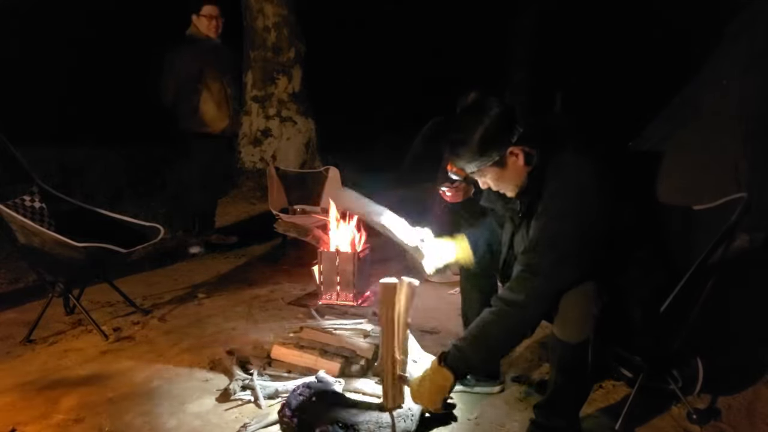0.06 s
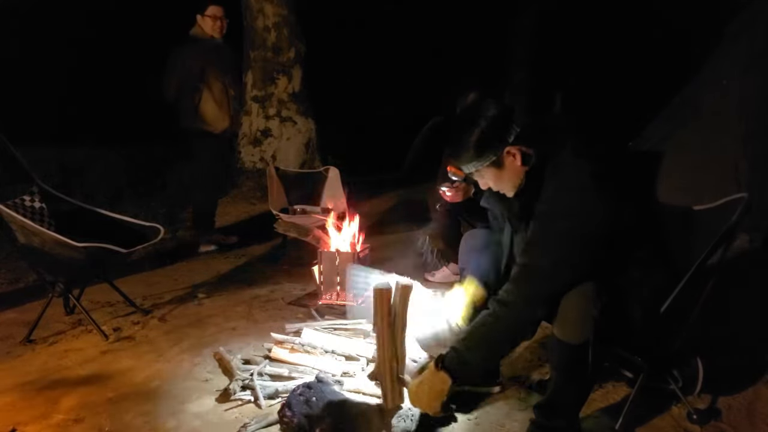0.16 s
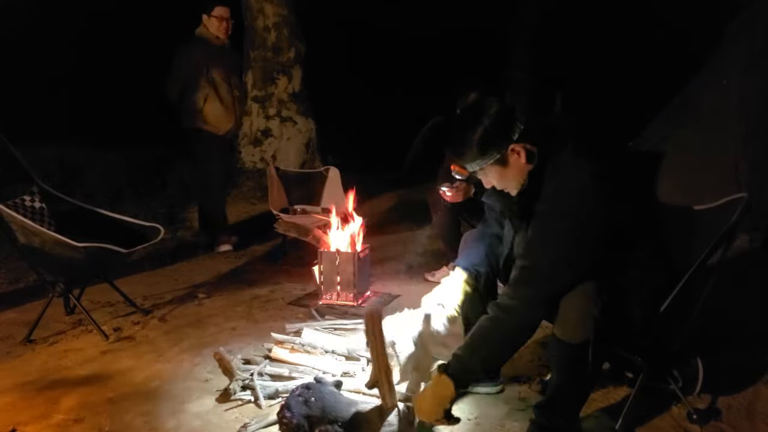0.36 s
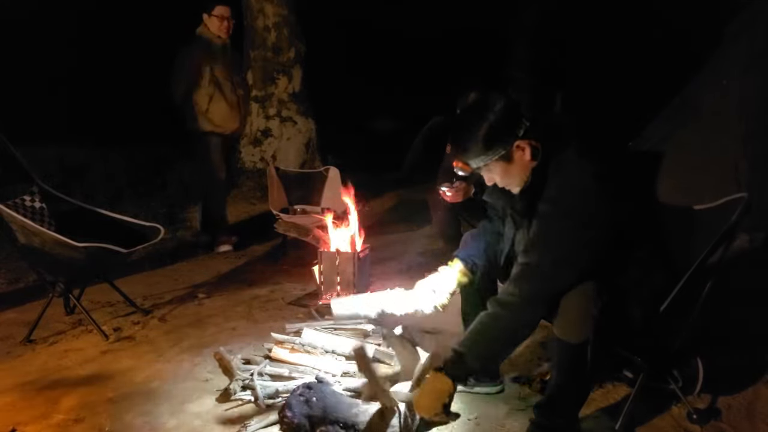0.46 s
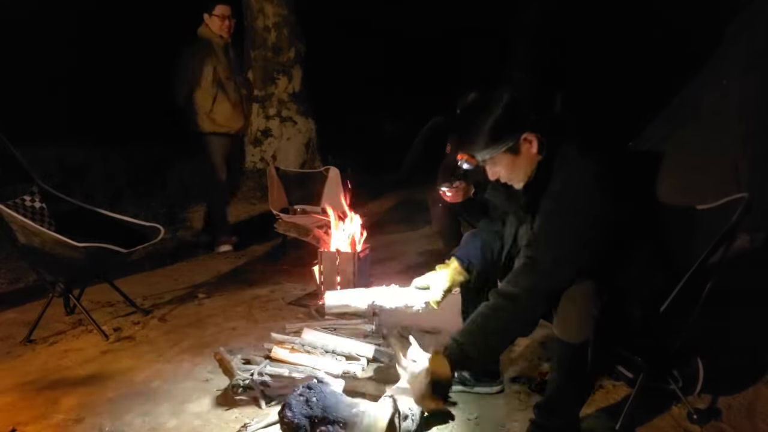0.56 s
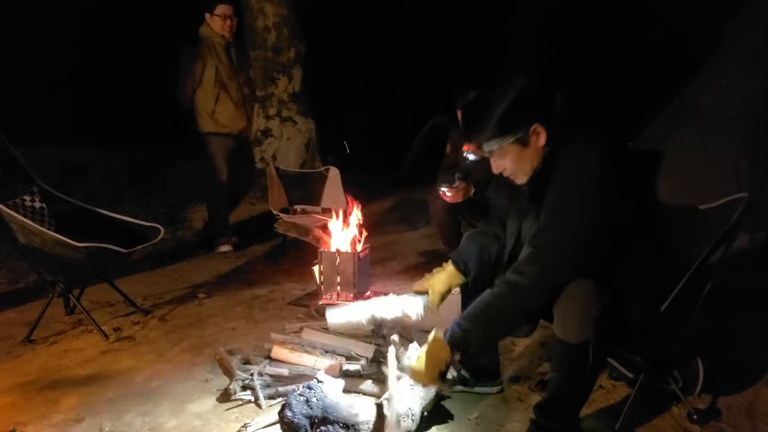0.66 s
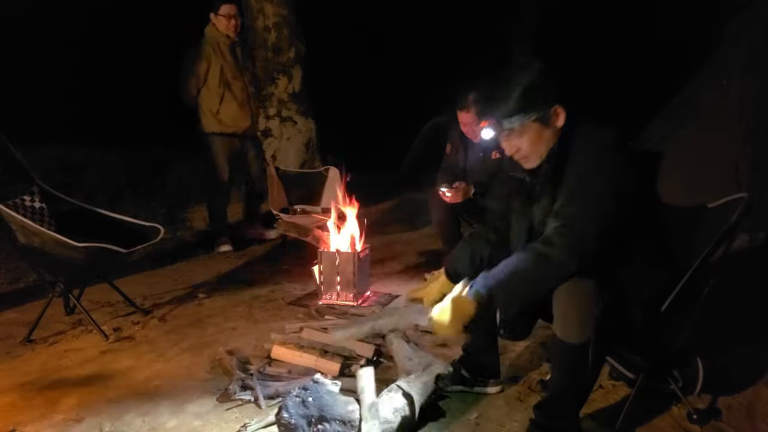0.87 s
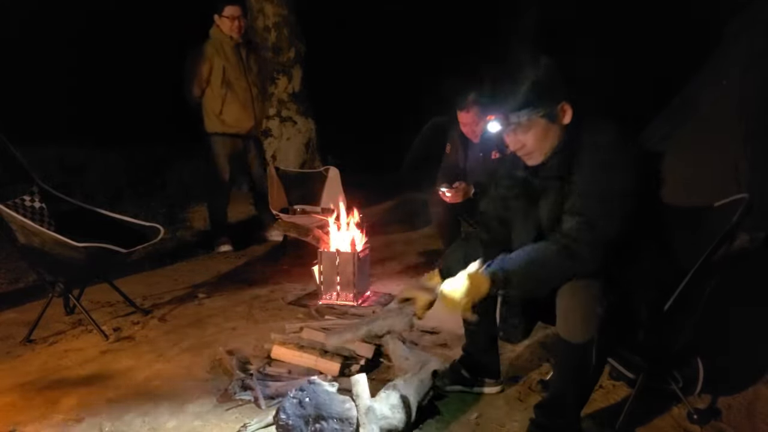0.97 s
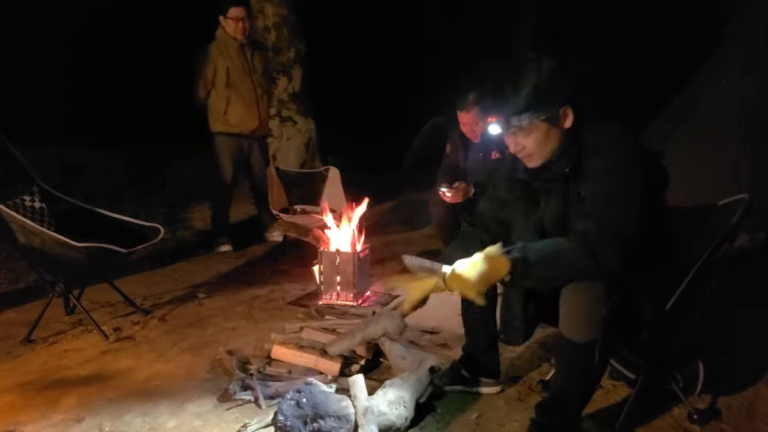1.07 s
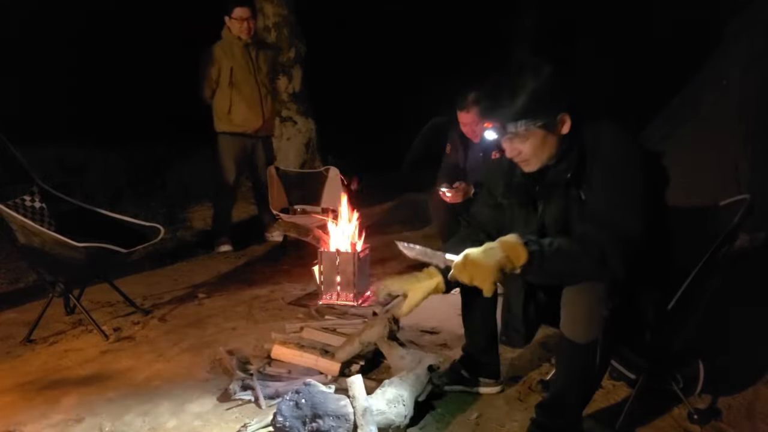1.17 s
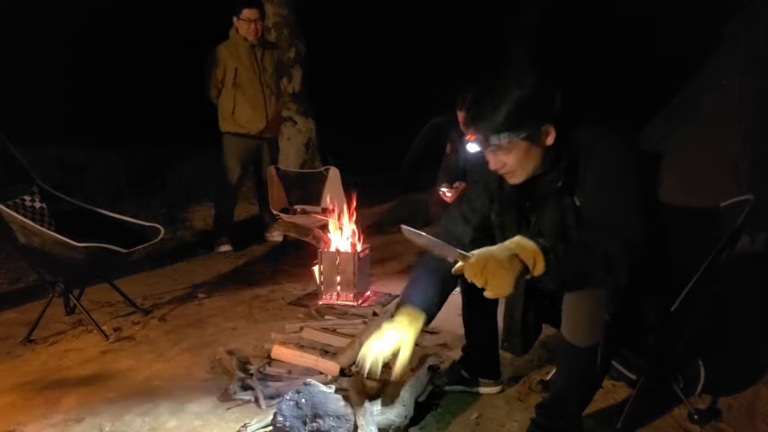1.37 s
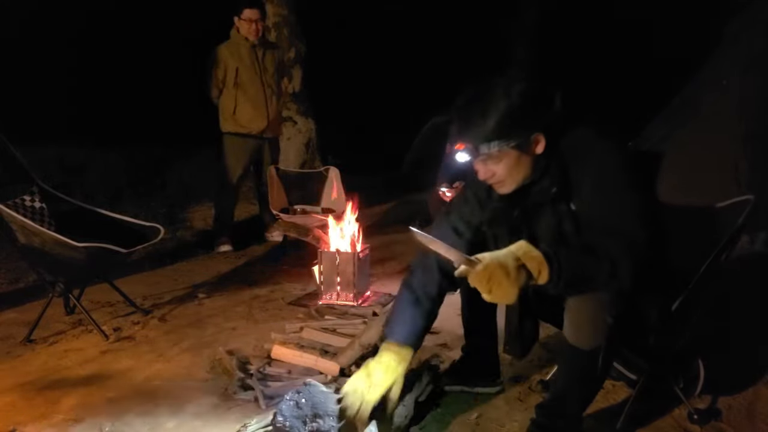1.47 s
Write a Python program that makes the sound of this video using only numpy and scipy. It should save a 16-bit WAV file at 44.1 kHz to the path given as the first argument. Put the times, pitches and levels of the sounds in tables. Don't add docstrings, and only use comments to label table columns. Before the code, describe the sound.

Firewood splitting: a hard crack of wood and steel, then lighter wooden knocks and dull thuds.

```python
import sys
import numpy as np
from scipy import signal
from scipy.fft import rfft, irfft
from scipy.io import wavfile
from scipy.ndimage import uniform_filter1d

SR = 44100
rng = np.random.default_rng(int(sys.argv[2]) if len(sys.argv) > 2 else 0)


def generate_wav(signal):
    frames = np.transpose(np.atleast_2d(signal))
    scaled = np.clip(frames, -1, 1) * 32767
    pcm = np.round(scaled).astype(np.int16)
    wavfile.write(sys.argv[1], SR, pcm)


def ratio_of_db(decibels):
    return 10 ** (np.asarray(decibels, float) / 20)


N = 66150

HARD_RISE_S, THUD_RISE_S, TAP_RISE_S = 0.00027, 0.001, 0.002
SPLIT_T60, POP_T60 = 0.012, 0.026
WIDTH_DB = -5.5

# frequency in Hz, density in dB per Hz.
SNAP_SPECTRUM = [(600, -3), (1000, -3.5), (2560, -4), (4500, -6), (6700, -5.5), (9000, -12), (14500, -8),
                 (16500, -18.5)]


def burst(db, hold_s, slope_db, t60):
    size, rise_s = 2048, 0.0004
    patch_db, patch_hz = 3.0, 600
    t = np.arange(size) / SR
    decay = ratio_of_db(-60 * np.maximum(t - hold_s, 0) / t60)
    shape = np.minimum(t / rise_s, 1) * decay
    patches = rng.standard_normal(size // 2 + 1)
    patches = evened(uniform_filter1d(patches, size=round(patch_hz * size / SR)))
    grit = irfft(rfft(pair(size, grit_db=3.5)) * ratio_of_db(patch_db * patches))
    return ratio_of_db(db) * shape * coloured(grit, SNAP_SPECTRUM, slope_db)


def ring(db, hz, t60, rise_s, sag=0.):
    sag_s = 0.006
    t = np.arange(round(.3 * SR)) / SR
    turns = np.cumsum(hz * (1 + sag * np.exp(-t / sag_s))) / SR
    return ratio_of_db(db - 60 * t / t60) * (1 - np.exp(-t / rise_s)) * np.sin(2 * np.pi * turns)


def knock(db, hz, t60, rise_s):
    blunt_push = ring(db - 9, 0.55 * hz, 0.019, rise_s)
    return ring(db, hz, t60, rise_s) + blunt_push


def strike(db, modes, slope_db=0.):
    out = 0
    for hz, own_db, t60 in modes:
        tilt_db = slope_db * np.log2(hz / 3000)
        out = out + ring(db + own_db + tilt_db, hz, t60, HARD_RISE_S)
    return out


SPLIT_TIMES = [
    .2125,
    .2177,
    .2271,
    .2312,
]
# level in dB, hold in seconds, brightness in dB per octave.
SPLIT_BURSTS = [(-13, 0.0048, -1.5), (-12, 0.0012, 3), (-26, 0.0034, 1), (-31.5, 0.0031, 1)]
# start in seconds, level in dB, hold in seconds,
# brightness in dB per octave.
CRACKS = [(0.4552, -55, 0.005, -7), (0.529, -50, 0.006, -4), (0.6612, -40, 0.004, -2),
          (0.675, -38, 0.0028, -4), (0.6861, -32.5, 0.0031, 2), (0.7034, -34, 0.002, -3),
          (.716, -41, 0.00099, 6), (0.721, -42, 0.0036, 13), (0.739, -40, 0.003, 6),
          (0.751, -41.5, 0.0023, 1), (0.78, -42, 0.016, -4), (.923, -46, 0.001, -8)]


def splitting():
    out = np.zeros((2, N))
    for s, (db, hold_s, slope_db) in zip(SPLIT_TIMES, SPLIT_BURSTS):
        add(out, s, burst(db, hold_s, slope_db, SPLIT_T60))
    for s, db, hold_s, slope_db in CRACKS:
        add(out, s, burst(db, hold_s, slope_db, SPLIT_T60))
    return out


# frequency in Hz, level in dB, t60 in seconds.
BLADE_MODES = [(3277, -15, 0.025), (3860, -13, 0.015), (4840, -16.5, .02), (2073, -16, 0.02),
               (11620, -17, 0.02), (9050, -19, 0.035)]
# start in seconds, level in dB, pitch in Hz, t60 in seconds.
SPRING = [(.2165, -12, 3290, .03), (.217, -14, 3870, .02), (.2175, -13, 7300, .016),
          (.2155, -11, 1346, .015), (.2155, -19, 2160, .016), (.2145, -19, 6315, .02),
          (.2275, -19, 1066, .04), (.2275, -27, 6200, .02), (.2275, -22, 1490, .04)]
# start in seconds, level in dB, pitch in Hz, t60 in seconds.
CHINKS = [(1.1708, -40.5, 3570, 0.032), (1.177, -42, 3300, 0.024), (1.174, -52, 1920, 0.05),
          (1.189, -56, 3800, 0.015), (1.293, -47.5, 3450, 0.029), (1.297, -52.5, 3840, 0.033)]


def blade():
    out = np.zeros((2, N))
    add(out, 0.2135, strike(0, BLADE_MODES))
    for s, db, hz, t60 in SPRING + CHINKS:
        add(out, s, ring(db, hz, t60, HARD_RISE_S))
    return out


# start in seconds, level in dB, pitch in Hz, t60 in seconds.
KNOCKS = [(0.2126, -10, 526, 0.038), (.2142, -8.5, 615, 0.019), (.2265, -5, 681, 0.053),
          (.2275, -9, 860, 0.051), (.228, -11.5, 614, 0.059), (.229, -9, 1333, 0.02),
          (.240, -19, 606, 0.023), (.6615, -26, 1010, 0.04), (.7045, -19, 500, 0.045),
          (.7105, -21, 620, 0.045), (.7215, -26.5, 553, 0.07), (.712, -27, 710, .04),
          (.7428, -24, 390, 0.025), (.794, -37, 1384, 0.06), (.787, -35.5, 1945, 0.053),
          (.706, -33, 2754, 0.033), (.677, -37, 1550, .04), (.678, -37, 3700, 0.015),
          (.686, -28.5, 1520, 0.014), (.686, -31.5, 2710, 0.027), (.709, -35, 1435, .04),
          (.722, -38, 3500, 0.012), (.662, -30, 571, .03), (.7525, -43, 2600, .02),
          (.9232, -35, 3200, .008), (.9232, -37, 4100, .006), (.7398, -37, 5600, .014),
          (.684, -38, 5240, .02), (.2135, -13, 370, .022), (.2285, -16, 540, .05),
          (0.2271, -10.5, 405, 0.021)]
# start in seconds, level in dB, pitch in Hz, t60 in seconds.
TAPS = [(.4738, -23, 640, .014), (.475, -29, 950, .014), (.5352, -24, 660, .018), (.5352, -25, 1200, .013),
        (.7808, -8.5, 545, .014), (.9232, -17, 580, .017), (.9298, -26, 450, .018), (.7945, -21, 486, .03),
        (.7905, -24, 750, .022), (.8215, -21, 440, .012), (.831, -29, 450, .015), (.799, -26, 700, .02),
        (.687, -23, 260, .03), (.811, -29, 350, .02), (.538, -33, 900, .03), (.2855, -27, 170, .04)]


def tumbling_pieces():
    out = np.zeros((2, N))
    for s, db, hz, t60 in KNOCKS:
        add(out, s, knock(db, hz, t60, HARD_RISE_S))
    for s, db, hz, t60 in TAPS:
        add(out, s, knock(db, hz, t60, TAP_RISE_S))
    return out


# start in seconds, level in dB, pitch in Hz, t60 in seconds.
THUDS = [(.232, -8.5, 82, 0.1), (.227, -13, 180, 0.056), (0.229, -21, 290, 0.05), (0.276, -30, 88.5, 0.098),
         (0.321, -29.5, 81, 0.09), (0.6614, -10, 187, 0.046), (0.667, -17.5, 98, 0.065),
         (0.703, -15.5, 114, 0.0674), (.706, -14.5, 335, 0.045), (.742, -11.5, 142, 0.02),
         (.738, -21, 100, 0.1), (0.797, -17.5, 170, 0.034), (0.801, -25, 300, 0.023),
         (0.9239, -33, 270, 0.035)]


def thuds():
    out = np.zeros((2, N))
    for s, db, hz, t60 in THUDS:
        add(out, s, ring(db, hz, t60, THUD_RISE_S, sag=0.25))
    return out


# start in seconds, level in dB, brightness in dB per octave.
TICKS = [(.6615, -36, -2), (.6685, -41, -1), (.6775, -44, -1), (.6858, -32, 1), (.6895, -35, 1),
         (.7036, -29, -2.5), (.7165, -44, 4), (.7215, -46, 0), (.7398, -39, 7), (.7445, -46, 3),
         (.7522, -44, 3), (.9232, -44, -2), (.5357, -47, -3), (.4565, -53, -4)]
# frequency in Hz, level in dB, t60 in seconds.
STICK_MODES = [(1430, 0, .02), (1850, -6, .012), (2420, -6, .015), (2700, -1, .025), (3700, -2, .014),
               (4850, -5, .012), (5500, -8, .012), (7200, -10, .01)]


def stick_ticks():
    out = np.zeros((2, N))
    for s, db, slope_db in TICKS:
        add(out, s, strike(db, STICK_MODES, slope_db))
    return out


# start in seconds, level in dB.
CHATTER = [(.7805, -40), (.7848, -36), (.7883, -32), (.7918, -35), (.7953, -38), (.799, -40), (.8025, -45)]
# frequency in Hz, level in dB, t60 in seconds.
EDGE_MODES = [(1400, -8, .014), (1930, -2, .016), (3400, 2, .011), (5400, -12, .01)]


def baton_chatter():
    out = np.zeros((2, N))
    for s, db in CHATTER:
        add(out, s, strike(db, EDGE_MODES))
    return out


def blow_tail():
    size, db, t60 = 20000, -35, 0.33
    out, t = np.zeros((2, N)), np.arange(size) / SR
    noise = coloured(pair(size, grit_db=2.5), HISS_SPECTRUM, -1.4)
    add(out, .222, ratio_of_db(db - 60 * t / t60) * noise)
    return out


# start in seconds, length in seconds, level in dB, top in Hz.
DRAGS = [(0.656, 0.056, -45, 4020), (0.5, 0.055, -52, 5000), (.645, 0.18, -49.5, 9000),
         (.765, 0.085, -46.5, 2930), (0.798, 0.25, -54.5, 3220), (0.967, 0.1, -47, 7050),
         (1.044, 0.15, -55.5, 9300), (1.16, 0.052, -50, 2000)]
# frequency in Hz, density in dB per Hz.
RUB_SPECTRUM = [(250, -10.5), (680, -8.5), (3200, -9.5), (6400, -16), (11200, -8.5), (14000, -10.5)]


def drags():
    size, out = 12000, np.zeros((2, N))
    for s, length_s, db, top_hz in DRAGS:
        u = np.clip(np.arange(size) / SR / length_s, 0, 1)
        swell = np.sin(np.pi * u) ** 2
        grit = coloured(pair(size, grit_db=1.2), RUB_SPECTRUM, 0., top_hz)
        add(out, s, ratio_of_db(db) * swell * grit)
    return out


# time in seconds, pitch in Hz, level in dB.
HOLLOW = [(.255, 760, -60), (.285, 930, -46), (.32, 1170, -50), (.37, 1260, -63), (.4, 1260, -110),
          (.79, 1377, -110), (0.801, 1377, -64), (.855, 1290, -53), (.93, 1081, -56.5), (.965, 856, -62),
          (1.013, 650, -44), (1.068, 580, -60.5)]


def hollow():
    width_hz, octave_db = 190, -17
    t = np.arange(N) / SR
    s, hz, db = np.transpose(HOLLOW)
    turn = np.exp(2j * np.pi * np.cumsum(np.interp(t, s, hz)) / SR)
    r = np.exp(-np.pi * width_hz / SR)
    slow = signal.lfilter([1], [1, -2 * r, r * r], rng.standard_normal((4, N)) / turn)
    hum = (turn * slow[:2] + ratio_of_db(octave_db) * turn ** 2 * slow[2:]).real
    hum = hum[0] + 0.48 * np.array([hum[1], -hum[1]])
    return evened(hum) * ratio_of_db(np.interp(t, s, db, -120, -120))


# start in seconds, level in dB, brightness in dB per octave, pan in dB.
POPS = [(0.0522, -43.5, 8.5, 4.5), (0.4242, -40.5, 8, 4), (1.123, -56, 8, 9), (1.2493, -41, 1, 6)]
# start in seconds, level in dB, pitch in Hz, t60 in seconds.
POP_RINGS = [(.0505, -45, 2750, .015), (.0505, -47, 1600, .015), (1.2495, -47, 2650, .02),
             (1.2495, -39, 600, .015), (1.2495, -40, 1300, .012), (.4245, -48, 3100, .012)]


def fire():
    rings = np.zeros((2, N))
    for s, db, hz, t60 in POP_RINGS:
        add(rings, s, ring(db, hz, t60, HARD_RISE_S))
    out = without_lows(rings, 77)
    for s, db, slope_db, pan_db in POPS:
        pan = ratio_of_db([[pan_db / 2], [-pan_db / 2]])
        add(out, s, burst(db, 0.00026, slope_db, POP_T60) * pan)
    return out


# frequency in Hz, t60 in seconds.
SCATTER_DECAY = [(100, 0.21), (600, 0.11), (1300, .18), (3500, 0.17), (9000, 0.1), (16000, 0.12)]


def scatter(x):
    size, likeness, wide_hz = SR // 2, 0.67, 300
    taps = np.zeros((2, size))
    at = np.arange(200, size - 20, 20)
    places = at + rng.integers(0, 20, (2, len(at)))
    np.put_along_axis(taps, places, rng.choice([-1., 1.], (2, len(at))), 1)
    apart = without_lows(taps[1], wide_hz)
    taps = taps[0] + likeness * np.array([apart, -apart])
    hz, t, z = signal.stft(taps, SR, nperseg=256)
    decay = ratio_of_db(-60 * t / read(SCATTER_DECAY, hz)[:, None])
    tail = signal.istft(z * decay, SR, nperseg=256)[1]
    return signal.fftconvolve(x, tail / np.linalg.norm(tail[0]), axes=1)[:, :N]


# time in seconds, level in dB.
WIND = [(0.0, -52), (0.472, -48), (1.5, -50)]
# frequency in Hz, density in dB per Hz.
RUMBLE_SPECTRUM = [(15, -14.5), (50, -0.5), (90, -10.5), (150, -10.5), (210, -22.5), (400, -32)]


def wind():
    low = rng.standard_normal(N) + 0.13 * rng.standard_normal((2, N))
    closed = list(RUMBLE_SPECTRUM) + [(700, -59)]
    return ratio_of_db(np.interp(np.arange(N) / SR, *np.transpose(WIND))) * coloured(low, closed)


# frequency in Hz, density in dB per Hz.
HISS_SPECTRUM = [(420, -10.5), (1050, -9.5), (2300, -18), (3300, -11.5), (6400, -24), (8500, -19),
                 (12500, -20), (15500, -21), (16000, -50.5)]
# frequency in Hz, left-right likeness from -1 to 1.
LIKENESS = [(60, 0.57), (180, 0.072), (550, 0.91), (1650, 0.054), (4970, -0.5), (15000, 0.01)]


def night_hiss():
    db, drift_db = -56.5, 1.7
    frames, hz = N // 256 + 5, np.fft.rfftfreq(1024, 1 / SR)
    a, b, c, d, patches = rng.standard_normal((frames, 513, 5)).T
    patches = uniform_filter1d(patches, size=14, axis=0)
    patches = evened(uniform_filter1d(patches, size=14, axis=1))
    same = np.clip(read(LIKENESS, hz), -1, 1)[:, None]
    left = a + 1j * b
    right = same * left + np.sqrt(1 - same ** 2) * (c + 1j * d)
    z = np.array([left, right]) * ratio_of_db(drift_db * patches)
    air = signal.istft(z, nperseg=1024, noverlap=768)[1][:, :N]
    return ratio_of_db(db) * coloured(air, HISS_SPECTRUM)


def evened(x):
    return x / np.sqrt(np.mean(x ** 2) + 1e-20)


def read(points, hz):
    f, value = np.transpose(points)
    return np.interp(np.log(hz + 1), np.log(f + 1), value)


def add(mix, s, sound):
    part = mix[..., round(s * SR):][..., :sound.shape[-1]]
    part += sound[..., :part.shape[-1]]


def without_lows(x, hz):
    return signal.sosfilt(signal.butter(2, hz, "high", fs=SR, output="sos"), x)


def coloured(x, points, slope_db=0., top_hz=20200.0):
    hz = np.fft.rfftfreq(x.shape[-1], 1 / SR)
    tilt_db = slope_db * np.log2(np.clip(hz, 500, None) / 4000)
    db = read(points, hz) + tilt_db - 40 * (hz < points[0][0] / 2)
    return evened(irfft(rfft(x) * ratio_of_db(db) / (1 + (hz / top_hz) ** 2), x.shape[-1]))


def pair(size, grit_db=0.):
    mid, side = rng.standard_normal((2, size))
    lumps = evened(uniform_filter1d(rng.standard_normal(size), size=40))
    return ratio_of_db(grit_db * lumps) * (mid + ratio_of_db(WIDTH_DB) * np.array([side, -side]))


def scene():
    log = splitting() + blade() + tumbling_pieces() + thuds() + stick_ticks() + baton_chatter() + blow_tail()
    near = without_lows(log, 77) + fire()
    return near + ratio_of_db(-17.5) * scatter(near) + drags() + hollow() + wind() + night_hiss()


def band_limit(x):
    return signal.sosfilt(signal.butter(12, 16820, fs=SR, output="sos"), x)


def record(dry):
    notch_hz, notch_width_hz, notch_db, edge_hz, ceiling = 6520, 520, -6, 16200, 0.96
    hz = np.fft.rfftfreq(N, 1 / SR)
    dip = notch_db * np.exp(-((hz - notch_hz) / notch_width_hz) ** 2)
    x = irfft(rfft(dry) * ratio_of_db(dip), N)
    band = signal.firwin(511, edge_hz, window=("kaiser", 9), fs=SR)
    x = signal.oaconvolve(x, band[None], "same")
    return band_limit(np.clip(x, -ceiling, ceiling))


dry = scene()
out = record(dry)
generate_wav(out)
```